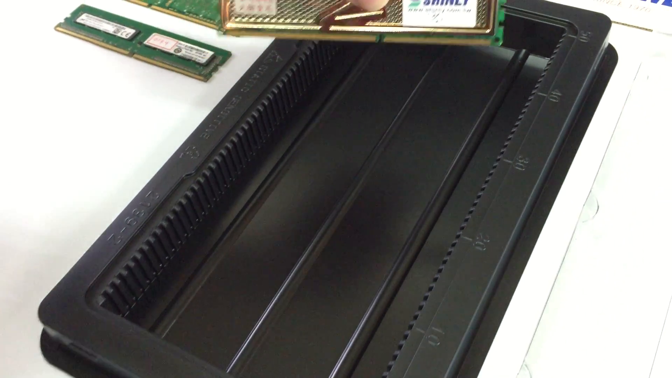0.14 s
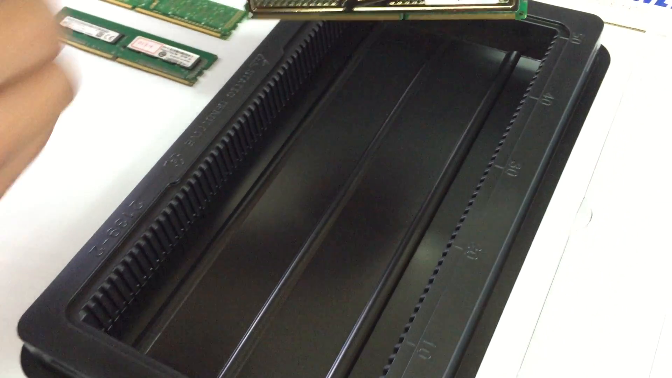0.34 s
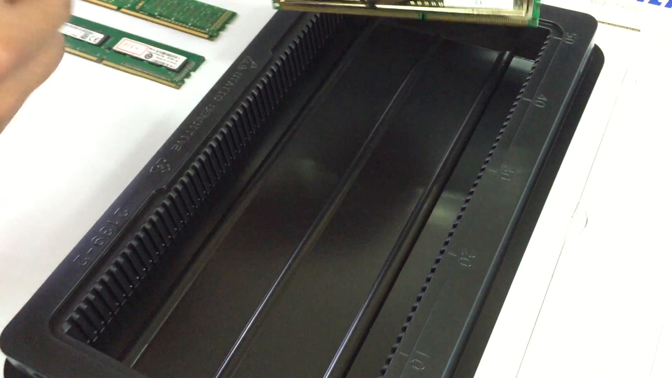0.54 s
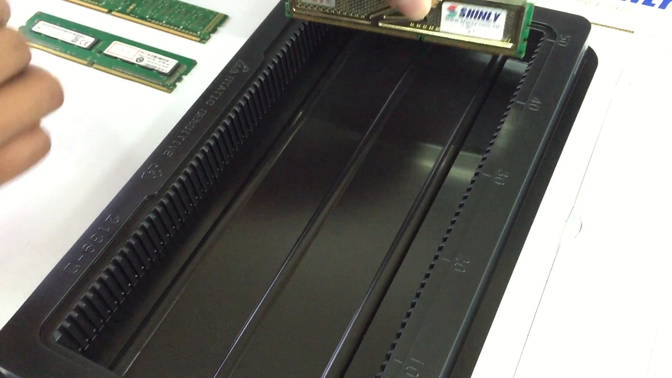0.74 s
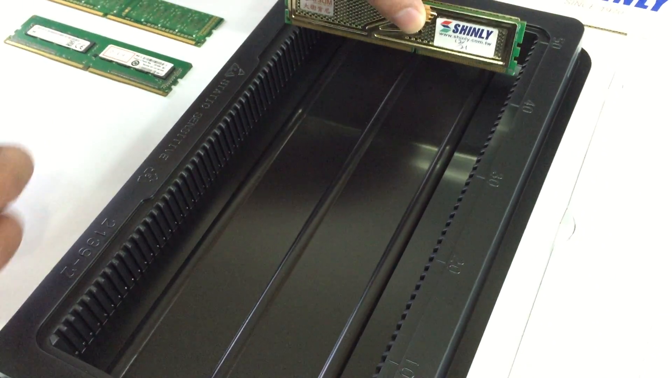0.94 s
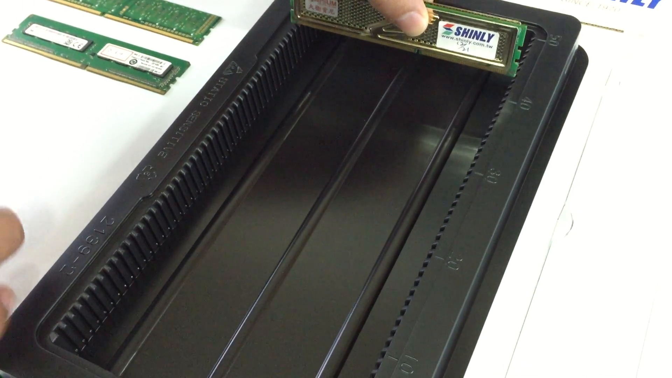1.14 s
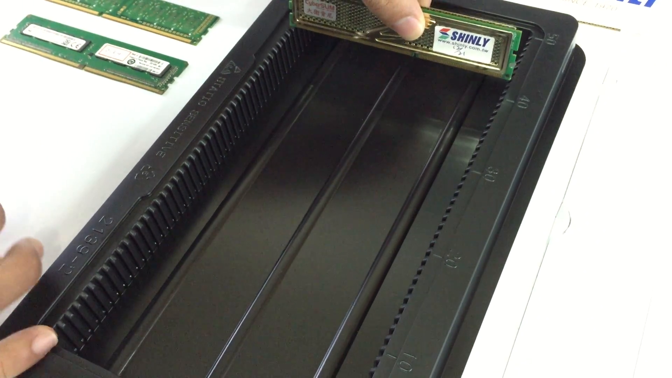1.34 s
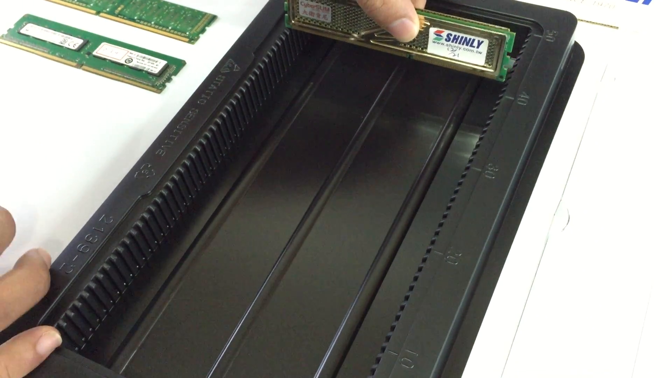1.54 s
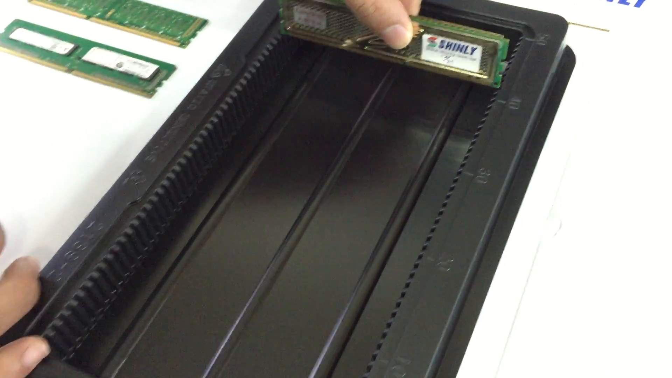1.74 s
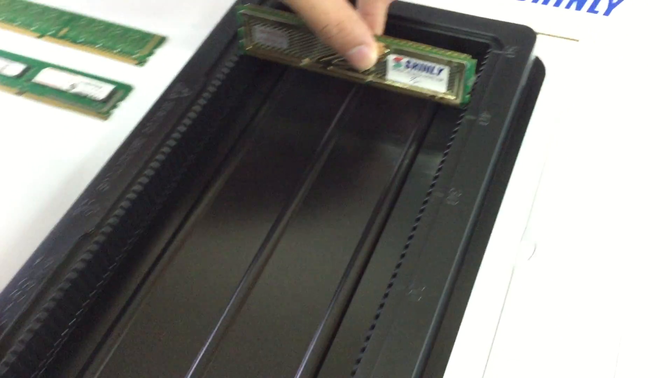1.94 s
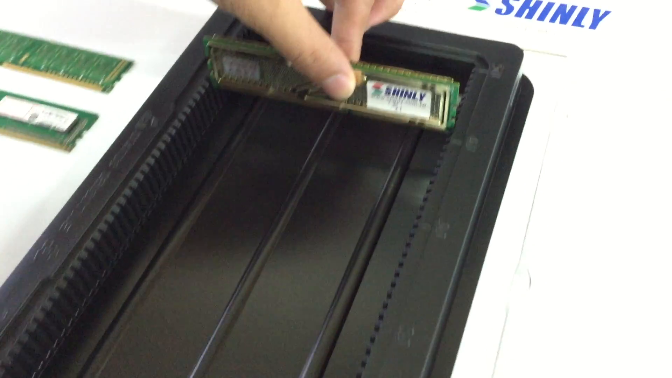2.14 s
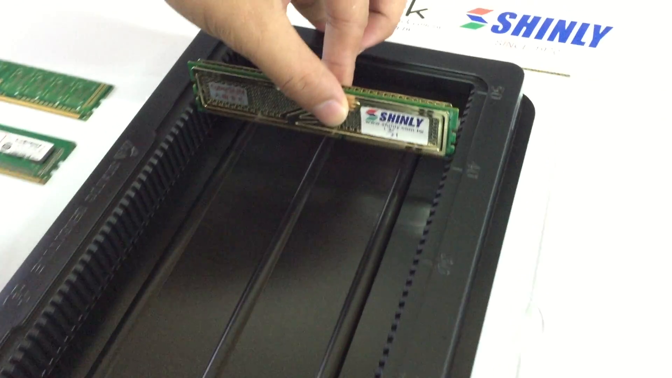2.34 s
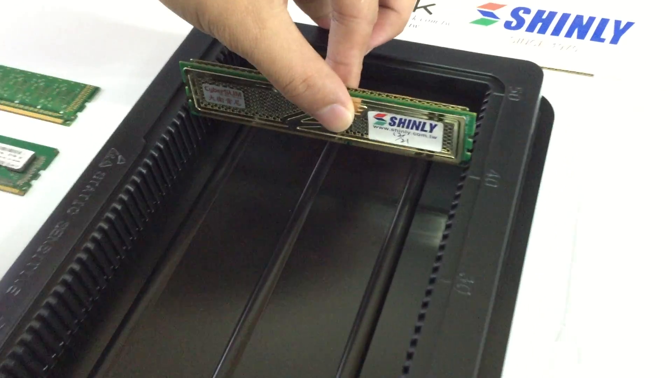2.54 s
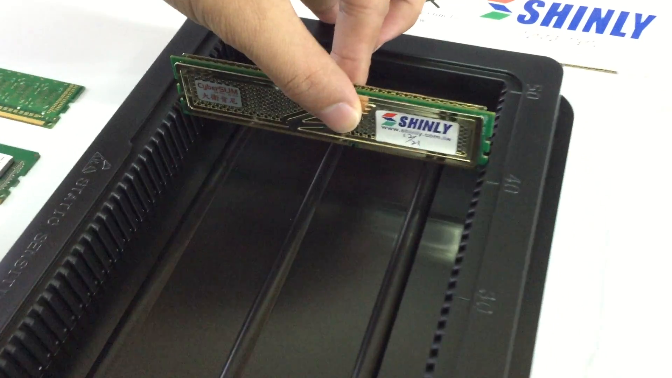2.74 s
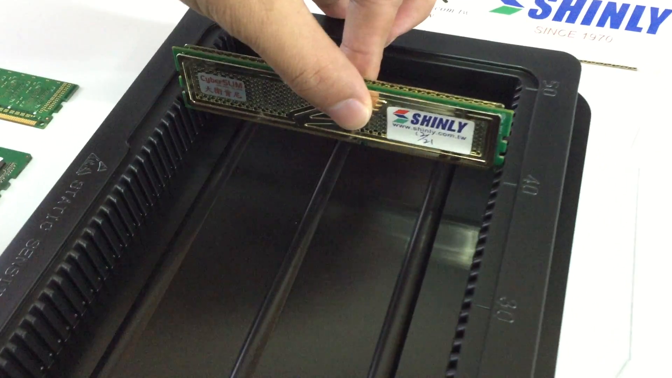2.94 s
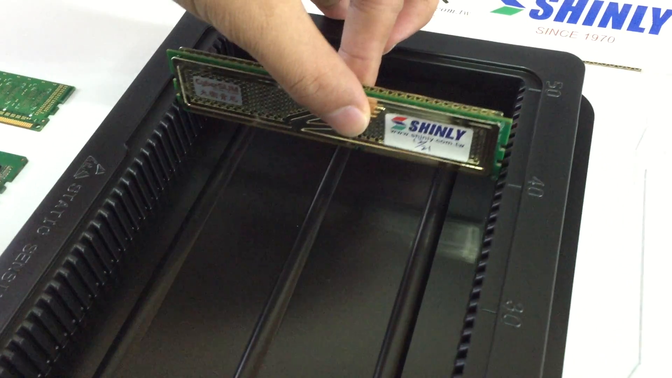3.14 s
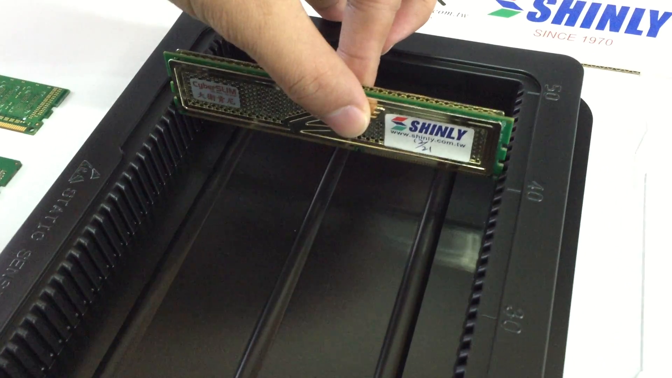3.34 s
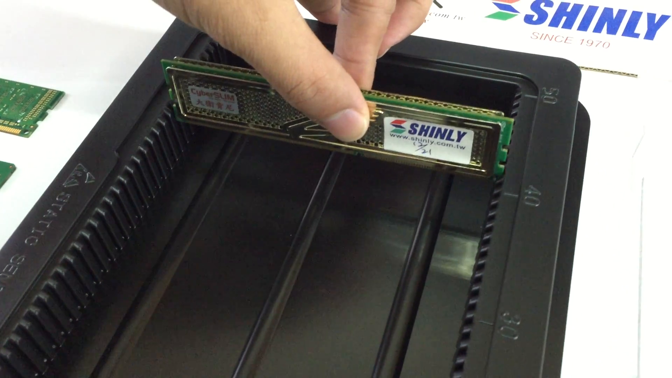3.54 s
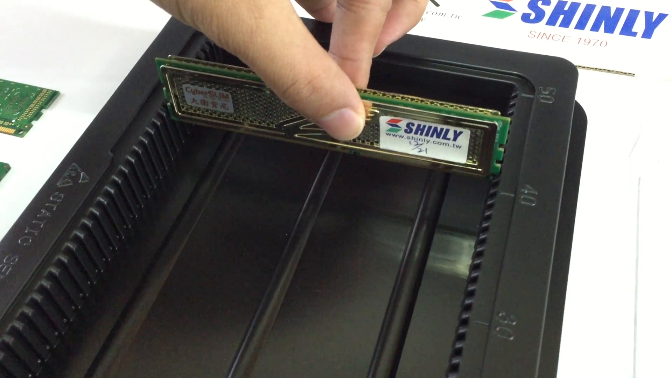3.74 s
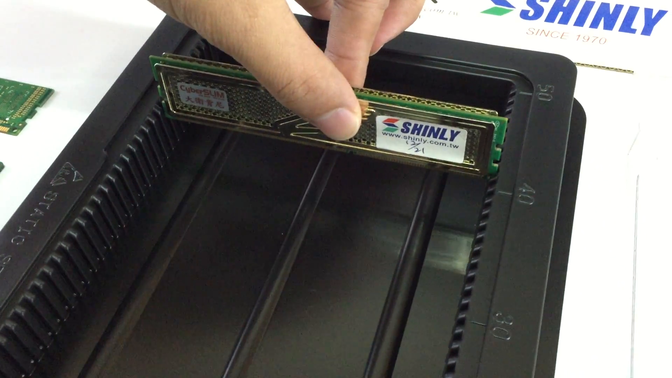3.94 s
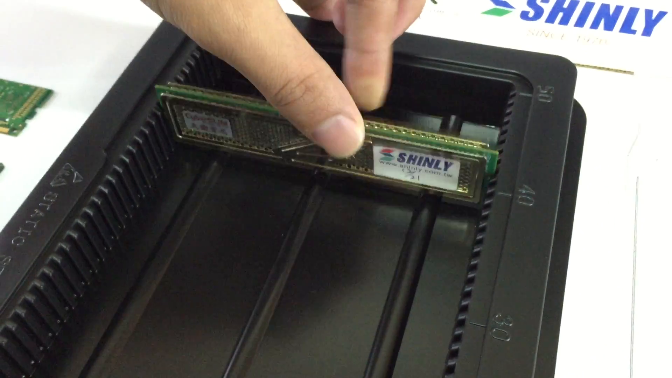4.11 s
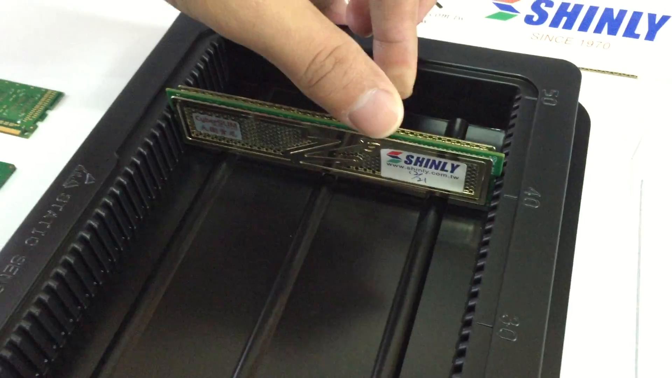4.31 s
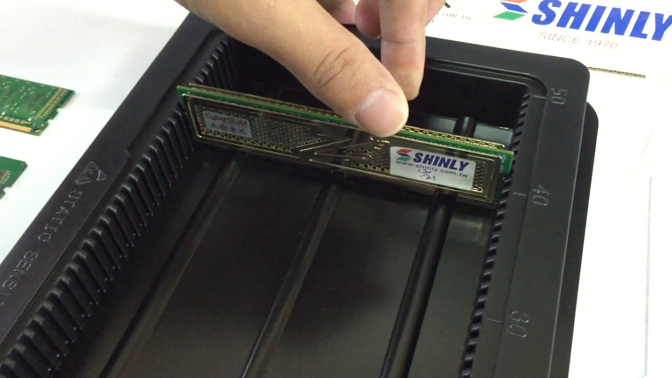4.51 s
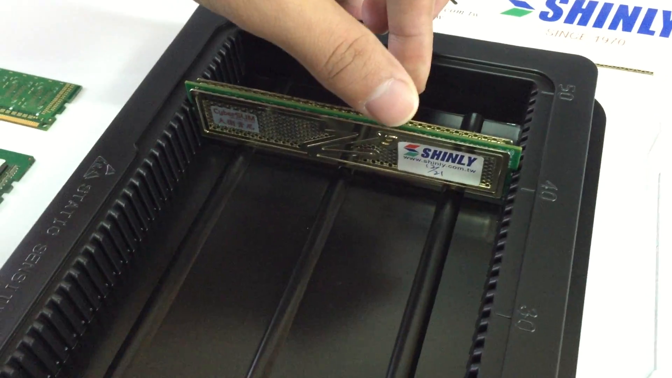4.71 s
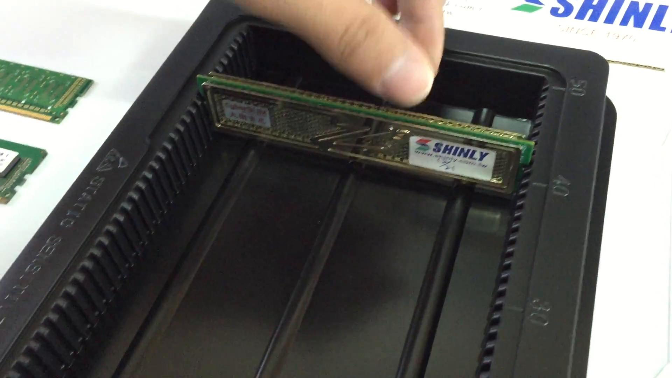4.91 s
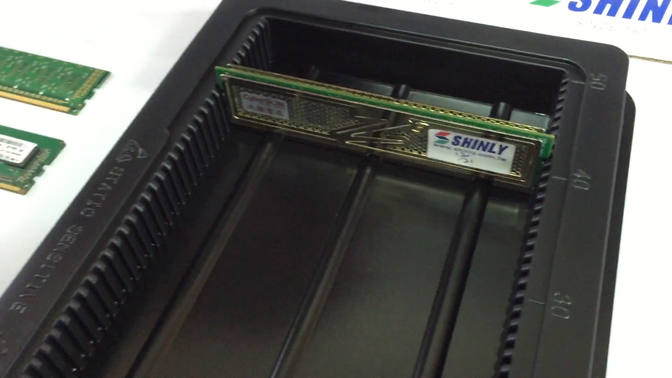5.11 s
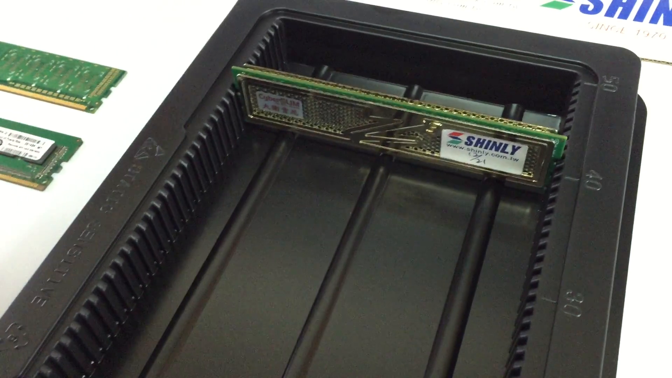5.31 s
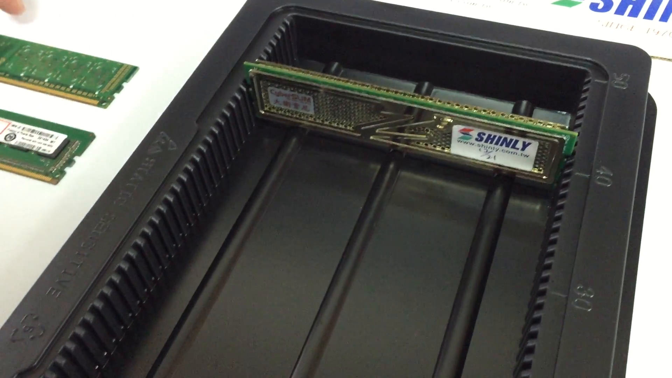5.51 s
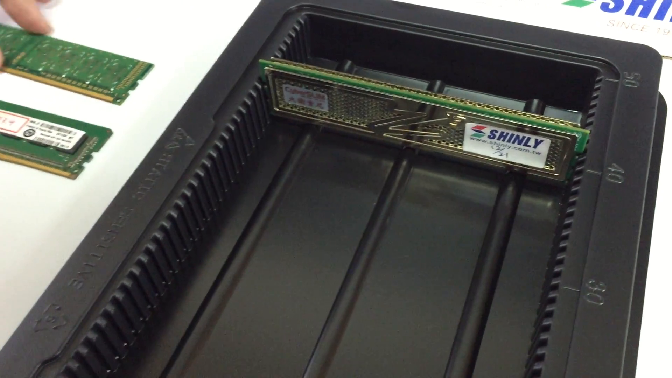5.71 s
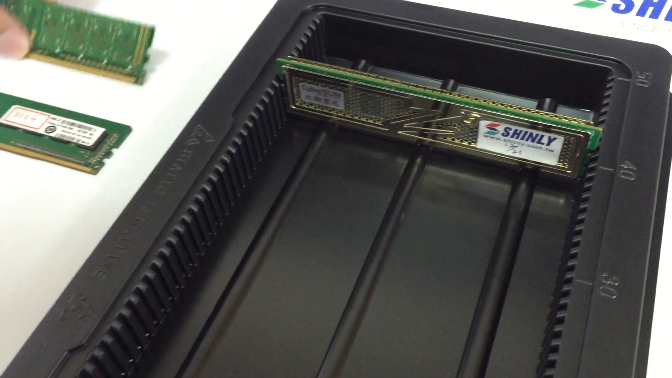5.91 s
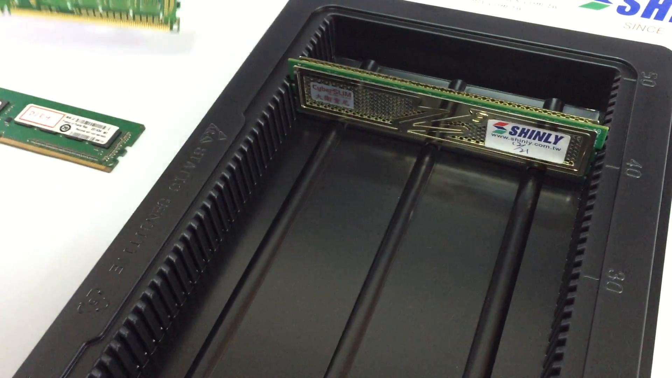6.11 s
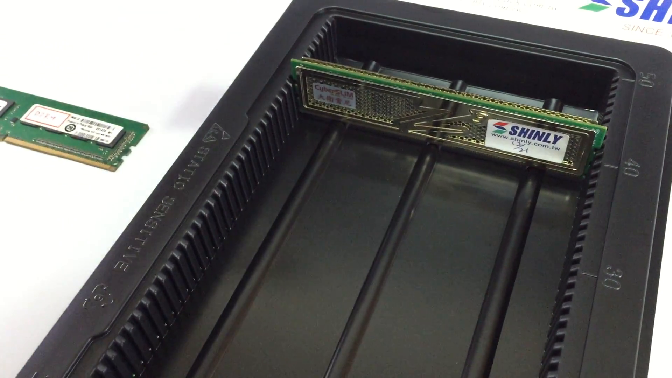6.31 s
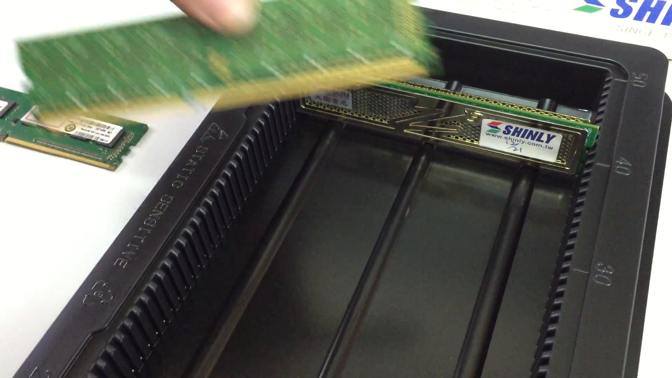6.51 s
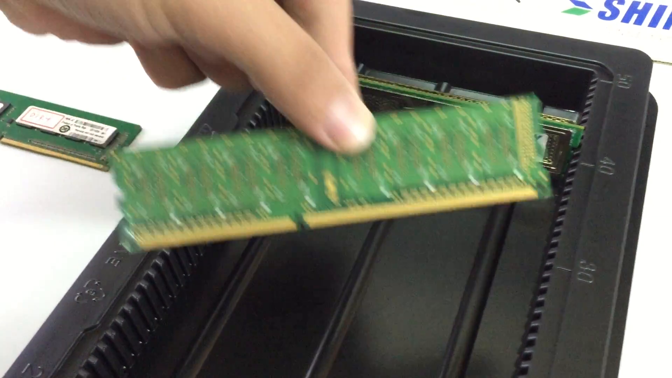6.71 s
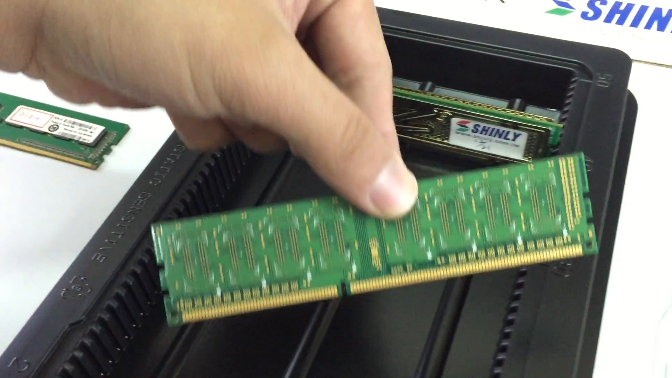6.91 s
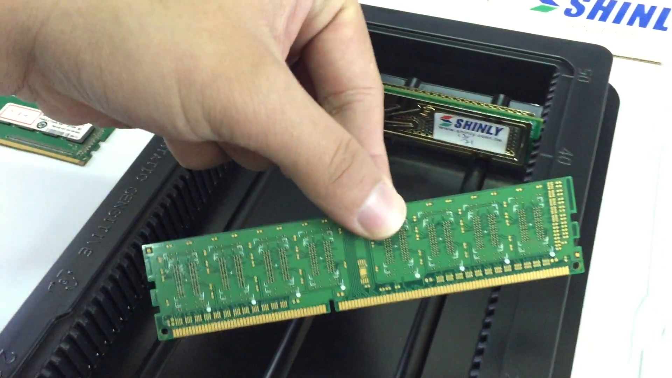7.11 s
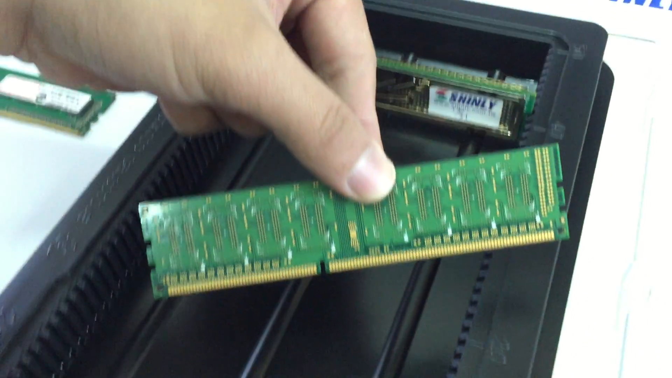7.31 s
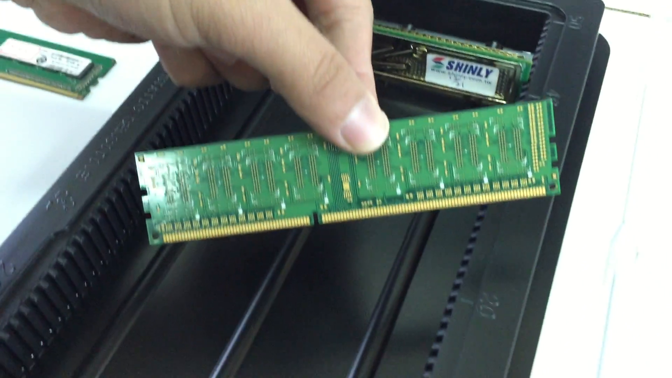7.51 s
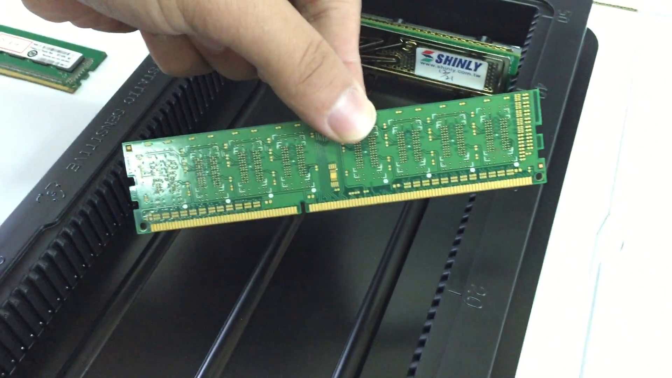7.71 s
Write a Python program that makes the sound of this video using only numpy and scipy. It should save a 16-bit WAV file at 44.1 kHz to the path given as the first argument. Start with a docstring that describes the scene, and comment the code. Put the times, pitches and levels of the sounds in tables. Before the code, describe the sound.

A circuit board taps and slides in a thin plastic tray, snaps home with an overloaded crack, then brief bright rubs follow in a humming room.

```python
"""A metal-covered memory module is worked into the slots of a thin plastic tray, close to a microphone.
Knocks ring the tray's modes, and hard edges crack and ring the module; the snap home overloads the input.
Between them, streams of tiny slips make the scuffs and slides, and narrow resonances the squeaks and drags.
Then a second module is picked up from the table. Filtered noise makes the small room's ventilation and hum."""
import sys
import numpy as np
from scipy import signal
from scipy.fft import rfft, irfft, next_fast_len
from scipy.io import wavfile

SR = 44100
rng = np.random.default_rng(int(sys.argv[2]) if len(sys.argv) > 2 else 0)


def unload_audio(sound):
    """Save the sound as a 16-bit wav file, at the path given as the first command line argument."""
    columns = np.transpose(np.atleast_2d(sound))
    # keep every value between -1 and 1, then stretch to whole-number steps
    steps = np.round(np.clip(columns, -1, 1) * 32767)
    wavfile.write(sys.argv[1], SR, steps.astype(np.int16))


N = 341775  # samples, 7.75 s


def amp(db):
    """Decibels to gain."""
    return 10 ** (np.asarray(db) / 20)


def unit(x):
    """Scales to rms 1."""
    return x / np.sqrt(np.mean(x ** 2) + 1e-20)


def read(points, hz):
    """Reads a spectrum table on a log-frequency axis."""
    f, value = np.transpose(points)
    return np.interp(np.log(hz + 1), np.log(f + 1), value)


def add(mix, start_s, sound):
    """Adds a sound to the mix from a start time, cutting off what overruns the end."""
    part = mix[max(round(start_s * SR), 0):][:len(sound)]
    part += sound[:len(part)]


def colour(x, gain):
    """Filters by a gain that is a function of frequency; rms 1."""
    size = next_fast_len(len(x))
    spectrum = rfft(x, size) * gain(np.fft.rfftfreq(size, 1 / SR))
    return unit(irfft(spectrum, size)[:len(x)])


def narrow(size, hz, width_hz):
    """Noise in one resonance; rms 1."""
    return colour(rng.standard_normal(size), lambda f: 1 / (1 + ((f - hz) / width_hz) ** 2))


def held(size, hz, width_hz):
    """A wavering tone whose swing is limited; rms 1."""
    tone = signal.hilbert(narrow(size, hz, width_hz))
    return unit(tone.real / np.sqrt(abs(tone) ** 2 + .3))


def uneven(size, depth_db, top_hz):
    """A gain that wanders at random, mostly slower than top_hz; depth_db is its rms swing."""
    wander = colour(rng.standard_normal(size), lambda f: 1 / (1 + (f / top_hz) ** 4))
    return amp(depth_db * wander)


def dying(spectrum, t60, size):
    """A dense response in which each band dies at its own speed."""
    noise = colour(rng.choice([-1., 1.], size), lambda f: amp(read(spectrum, f)))
    hz, t, bands = signal.stft(noise, SR, nperseg=256)
    decay = amp(-60 * t / read(t60, hz)[:, None])
    return signal.istft(bands * decay, SR, nperseg=256)[1][:size]


def ringing(modes, t):
    """Struck modes dying away; neighbours in the table swing in opposite senses."""
    hz, level_db, t60_s = np.transpose(modes)[:, :, None]
    sign = (-1) ** np.arange(len(modes))[:, None]
    rings = sign * amp(level_db - 60 * t / t60_s) * np.sin(2 * np.pi * hz * t)
    return unit(rings.sum(0))


def grains(size, spread_db, per_s):
    """Friction: a stream of tiny slips of uneven strength."""
    strength = amp(spread_db * np.minimum(rng.exponential(1, size), 4))
    slipping = rng.random(size) < per_s / SR
    return rng.choice([-1., 1.], size) * strength * slipping


def stroke(t, rise_s, fall_s):
    """Contact pressure builds up to t = 0, then lets go."""
    return np.exp(np.where(t < 0, t / rise_s, -t / fall_s))


# rush of air, relative density per Hz: pitch_hz, level_db
AIR_COLOUR = [(20, -28.5), (35, -13.5), (53, -6.5), (80, -4.5), (130, -7), (210, -12.5), (320, -17.5),
              (420, -26.5), (600, -31), (900, -29.5), (2200, -33), (3000, -38.5), (6000, -42),
              (9000, -45.5), (10300, -49.5), (12000, -46), (15000, -51)]
# deepest hum, swelling and sinking slowly: time_s, level_db
HUM_SWELL = [(0, -55.5), (.5, -48.5), (2.2, -52.5), (3.2, -54), (3.9, -46), (4.6, -48), (5.3, -51.5),
             (6.0, -55.5), (7.15, -48.5), (7.75, -58)]
# higher hum in the room: pitch_hz, width_hz, level_db
ROOM_HUMS = [(110, 25, -56.5), (157, 25, -67), (204, 16, -58.5), (392, 15, -78.5), (577.4, 20, -78.5),
             (876.4, 20, -81)]


def ventilation(air_db=-53, hum_hz=54, waver_db=2.5, waver_hz=4):
    """A steady rush of air as shaped noise, with a wavering hum and faint fan tones as narrow bands."""
    air = colour(rng.standard_normal(N), lambda f: amp(read(AIR_COLOUR, f)))
    swell = amp(np.interp(np.arange(N) / SR, *np.transpose(HUM_SWELL)))
    hum = swell * held(N, hum_hz, width_hz=9.1) * uneven(N, waver_db, waver_hz)
    fan_tones = sum(amp(level_db) * narrow(N, hz, width_hz) for hz, width_hz, level_db in ROOM_HUMS)
    return amp(air_db) * air + hum + fan_tones


def room(x, wet_db=-26, delay_s=.008):
    """A short, faint tail from the furnished room, each band dying at its own speed."""
    # pitch_hz, level_db
    tail_colour = [(100, -1.0), (800, -2.0), (1500, 0), (3000, 0.0), (5000, -4.5),
                   (7300, 0.5), (8800, -4), (10500, 3), (15000, 1.0)]
    # pitch_hz, t60_s
    tail_t60 = [(150, .25), (1500, 0.17), (5000, 0.22), (14000, 0.15)]
    tail = dying(tail_colour, tail_t60, size=16384)
    echo = np.zeros(N)
    add(echo, delay_s, signal.fftconvolve(x, tail / np.linalg.norm(tail)))
    return x + amp(wet_db) * echo


def rubbed_tones(rows):
    """Friction feeds one resonance for as long as the stroke lasts."""
    out, t = np.zeros(N), np.arange(-SR // 2, SR // 2) / SR
    for peak_s, level_db, rise_s, fall_s, hz, width_hz in rows:
        tone = stroke(t, rise_s, fall_s) * held(len(t), hz, width_hz)
        add(out, peak_s + t[0], amp(level_db) * tone)
    return out


# faint whistles: peak_s, level_db, rise_s, fall_s, pitch_hz, width_hz
DRAG_STROKES = [(.08, -69.5, 1, 0.12, 1480, 60), (.72, -69.5, 0.47, 0.13, 5670, 260),
                (0.65, -74, .15, 0.13, 7400, 300), (.84, -70, 0.28, 0.12, 2800, 250),
                (1.42, -70, 0.19, .22, 2200, 230), (1.45, -78, 0.12, 0.29, 6050, 350),
                (3.23, -62.5, 0.024, 0.082, 4220, 180), (3.48, -66, 0.051, 0.13, 4340, 220),
                (4.14, -64, .025, 0.055, 4230, 219.5), (6.56, -76, 0.18, 0.16, 6200, 199.8),
                (6.6, -64, 0.21, 0.17, 2580, 220)]


def drags():
    """Fingers and board edges dragging on smooth faces excite faint, narrow whistles."""
    return rubbed_tones(DRAG_STROKES)


# strokes along the ribs and of fingers over plastic: peak_s, body_db, rise_s, fall_s, fizz_db
SLIDE_STROKES = [(.43, -58, 0.054, 0.064, -63), (.52, -70, 0.073, .07, -58.5), (.82, -68, .45, 0.15, -67.5),
                 (1.42, -69.5, .2, .6, -74), (2.511, -62.5, 0.021, .03, -67),
                 (2.88, -54.5, .04, 0.27, -59.5), (3.015, -51, 0.048, 0.14, -57.5),
                 (3.135, -62, .03, .018, -78), (3.23, -59.5, 0.042, 0.087, -67),
                 (3.3, -70, .055, 0.081, -60), (3.48, -61.5, 0.084, 0.095, -64),
                 (3.76, -63.5, 0.097, 0.056, -72), (4.14, -61.5, 0.054, 0.076, -84),
                 (5.18, -61.5, .04, 0.025, -75), (5.29, -68, 0.062, 0.062, -67),
                 (5.47, -74, 0.021, .03, -68), (5.78, -72, 0.066, .14, -70.5),
                 (6.12, -63, 0.042, 0.082, -66), (6.3, -70, 0.16, 0.47, -70.5), (7.04, -61, 0.11, .06, -66)]
# body of the sliding friction, relative density per Hz: pitch_hz, level_db
SLIDE_BODY_COLOUR = [(290, -40.5), (500, -7), (610, 2), (694, -18), (1110, -3), (1370, -5), (2260, -5.5),
                     (2430, -3.5), (2640, -1.5), (4290, -6), (15000, -24.5)]
# its airy top, relative density per Hz: pitch_hz, level_db
SLIDE_FIZZ_COLOUR = [(2000, -42), (5500, 1), (8500, -0.5), (10300, -6.5), (12500, -1.5), (15500, -7.5)]


def sliding(tick_db=-4.5, tremble_db=1.1, tremble_hz=35, roundness=1.8):
    """Longer, faint strokes: friction swells and ends smoothly, and the hand's pressure trembles."""
    peak_s, body_db, rise_s, fall_s, fizz_db = np.transpose(SLIDE_STROKES)[:, :, None]
    t = np.arange(N) / SR - peak_s
    pressure = np.exp(-abs(t / np.where(t < 0, rise_s, fall_s)) ** roundness)
    slips = unit(grains(N, spread_db=1.5, per_s=6000))
    # sparser, stronger slips: the edge catches and ticks
    ticks = unit(grains(N, spread_db=3, per_s=220))
    body = colour(slips + amp(tick_db) * ticks, lambda f: amp(read(SLIDE_BODY_COLOUR, f)))
    fizz = colour(grains(N, spread_db=2.0, per_s=20000), lambda f: amp(read(SLIDE_FIZZ_COLOUR, f)))
    level = lambda db: np.linalg.norm(amp(db) * pressure, axis=0)  # overlapping strokes add in power
    return uneven(N, tremble_db, tremble_hz) * (level(body_db) * body + level(fizz_db) * fizz)


# short rubs of board edges and fingertips, fizz_db being the floor above the upper edge:
# peak_s, level_db, rise_s, fall_s, low_edge_hz, high_edge_hz, fizz_db
SCUFF_STROKES = [(.166, -54, 0.011, 0.018, 1400, 2610, -35), (0.38, -38.5, 0.01, 0.021, 870, 2420, -28.5),
                 (.386, -30, 0.003, 0.0073, 2060, 7160, -44), (0.404, -44.5, 0.011, 0.033, 4500, 7400, -34),
                 (2.388, -58.5, 0.0047, 0.0061, 1000, 8000, -2),
                 (2.476, -52.5, 0.005, 0.01, 900, 3800, -20), (2.663, -46, 0.0018, 0.012, 1200, 5100, -31),
                 (2.69, -46, 0.019, 0.018, 950, 2700, -33), (2.816, -52, 0.014, 0.042, 1000, 2740, -28),
                 (2.841, -32, 0.0026, 0.015, 1120, 4600, -57),
                 (4.2346, -35.5, 0.00054, 0.0084, 7560, 13000, -20.5),
                 (4.708, -46.5, 0.01, 0.027, 1260, 3100, -15.5), (5.36, -56.5, .008, .015, 1500, 6000, -29),
                 (5.497, -55, 0.0052, 0.015, 1000, 2510, -30), (5.576, -55.5, 0.0055, 0.01, 900, 2500, -33),
                 (5.602, -51.5, 0.0034, 0.014, 1700, 3000, -25),
                 (5.6167, -41, .001, 0.0052, 1900, 3530, -43), (5.711, -56.5, .002, 0.0055, 1600, 9100, -2),
                 (5.821, -48, 0.0087, 0.017, 1400, 2970, -43),
                 (5.845, -57.5, 0.0096, 0.011, 2500, 7980, -23),
                 (5.905, -47.5, 0.0038, 0.023, 1690, 3980, -42.5),
                 (6.017, -33.5, 0.0076, 0.018, 1980, 3560, -21),
                 (6.038, -33, 0.015, 0.016, 1020, 4040, -15),
                 (6.1762, -32.5, .0002, 0.0045, 1990, 13200, -12),
                 (6.185, -31, 0.0021, 0.01, 2160, 13000, -3),
                 (6.204, -39.5, 0.0055, 0.0087, 2200, 8750, -25),
                 (6.345, -52.5, 0.00977, 0.019, 985, 3050, -40),
                 (6.813, -51.5, 0.0026, 0.017, 1300, 2130, -45),
                 (6.905, -55, 0.0065, 0.02, 1300, 2480, -24), (6.958, -36, 0.0027, 0.017, 1306, 2730, -33),
                 (6.98, -56.5, 0.025, 0.031, 1410, 6020, -23.5),
                 (7.06, -57.5, 0.016, 0.021, 5010, 13000, -15), (7.235, -59, .008, .025, 2000, 12020, -19),
                 (7.305, -63, .01, .035, 3990, 11000, -15)]


def scuffs(body_db=-15, catch_db=-0.82, catch_hz=220):
    """Brief bursts of slips: fingertips sound low and narrow, board edges wide and bright."""
    out, t = np.zeros(N), np.arange(-4096, 8192) / SR
    for peak_s, level_db, rise_s, fall_s, low_hz, high_hz, fizz_db in SCUFF_STROKES:
        # body_db is the floor left below the lower edge
        above = lambda f: amp(body_db) * f / (f + 150) + 1 / np.sqrt(1 + (low_hz / (f + 1)) ** 6)
        below = lambda f: amp(fizz_db) + 1 / np.sqrt(1 + (f / high_hz) ** 7)
        slips = colour(grains(len(t), spread_db=1.5, per_s=9700), lambda f: above(f) * below(f))
        # the grip catches and releases at random
        rub = unit(slips * uneven(len(t), catch_db, catch_hz))
        add(out, peak_s + t[0], amp(level_db) * stroke(t, rise_s, fall_s) * rub)
    return out


def through_board(x, ring_db=-4, ring_t60_s=0.036):
    """Friction also shakes the crowd of small resonances in the board, a short dying noise."""
    t = np.arange(2048) / SR
    ring = rng.standard_normal(len(t)) * amp(-60 * t / ring_t60_s)
    rung = signal.oaconvolve(x, ring / np.linalg.norm(ring))[:N]
    return (x + amp(ring_db) * rung) / np.hypot(1, amp(ring_db))


# rubs that catch: peak_s, level_db, rise_s, fall_s, pitch_hz, width_hz
SQUEAK_STROKES = [(2.842, -34.5, 0.0025, 0.013, 3070, 250), (5.618, -41, .001, 0.0074, 2040, 100),
                  (6.03, -45, 0.0042, 0.022, 1110, 115.5), (6.19, -32.5, 0.0037, 0.0069, 5380, 120.5),
                  (6.195, -40, 0.0057, 0.015, 2440, 130), (6.199, -40, 0.0056, 0.0052, 5480, 185.2),
                  (6.2, -43, 0.0022, 0.013, 1920, 152)]


def squeaks():
    """Rubs that catch make one resonance of a board ring."""
    return rubbed_tones(SQUEAK_STROKES)


# blows of the module on the tray, edge_db setting the hard edge against the soft push:
# start_s, level_db, contact_brightness_hz, edge_db
KNOCK_BLOWS = [(.383, -42, 1110, -1), (1.602, -52, 1440, -18), (1.903, -43.5, 1790, -11),
               (2.027, -48, 1200, -9), (2.1635, -42, 1730, -15), (2.839, -44.5, 1110, -22),
               (3.0584, -34, 2330, -14), (3.0625, -39.5, 2120, -2), (3.195, -40, 1113, -14.5),
               (3.3061, -41, 910, -22), (3.588, -43, 1500, -6), (3.6004, -32.5, 1500, -8.5),
               (3.611, -41, 1410, -7), (3.8041, -46.5, 1120, -20), (3.85, -51.5, 1200, -15),
               (4.134, -40, 1290, -12.5), (4.1532, -35, 1900, -7.5), (4.166, -35.5, 1400, -8.5),
               (4.207, -50, 1200, -3), (4.227, -41, 1366, -9), (4.2301, -28, 1310, -10.5),
               (4.2339, -25.5, 1590, -5), (4.2405, -22, 1625, -4.5), (4.2516, -4.5, 650, 10.5),
               (4.2574, -5, 600, 10.5), (4.2611, -14.5, 896, -7), (4.2702, -24, 2510, 1.5),
               (4.2773, -22.5, 2500, 1), (5.236, -47, 900, -3), (5.6168, -50, 1500, 3),
               (6.811, -54, 1600, -8), (6.9573, -41.5, 990, 3.5)]
# modes of the thin tray: pitch_hz, level_db, t60_s
TRAY_MODES = [(151, -13, 0.084), (185, -4.5, 0.075), (280, -14.5, 0.17), (341.3, -11, 0.082),
              (522, -4, 0.028), (560.5, -9, .05), (645, -3, 0.034), (964, -2, 0.043), (1064, -6.5, 0.081),
              (1145, -3, .05), (1305, -5.5, 0.034)]
# crowd of small tray modes between them, relative density per Hz: pitch_hz, level_db
PANEL_COLOUR = [(40, -34), (120, -3.5), (280, -1.5), (430, -1.5), (620, 3), (800, -6), (1100, -0.5),
                (1600, -3), (2200, -3), (4000, -9), (15000, -25)]
# their decay: pitch_hz, t60_s
PANEL_DECAY = [(100, 0.27), (500, 0.053), (2000, 0.057), (6000, 0.015), (15000, 0.029)]
# modes of the board and its metal cover: pitch_hz, level_db, t60_s
MODULE_MODES = [(1437, 0, 0.063), (1877, -12, 0.059), (2060, -4.5, 0.02), (2150, -3.5, 0.052),
                (2326, 1.5, 0.056), (2680, -11, .04), (2870, -9.5, 0.068), (3140, -12, .03),
                (3614, -5.5, 0.044), (4690, -3, 0.027), (4663, -0.5, 0.044), (4856, -4, 0.013),
                (5233, -7.5, .018), (6100, -4.5, 0.028), (5700, -7, 0.013)]
# crack of a board edge on a rib, relative density per Hz: pitch_hz, level_db
CRACK_COLOUR = [(300, -13.5), (900, -13.5), (1400, 0), (2300, -1), (3300, -4), (4700, 5.5), (6200, -2.5),
                (7300, -15.5), (8800, -6.5), (10300, -20), (12000, -13.5), (15000, -16)]
# its decay: pitch_hz, t60_s
CRACK_DECAY = [(500, 0.043), (2000, 0.04), (5000, 0.022), (9000, 0.027), (15000, 0.02)]


def knocks(panel_db=-3, lowest_hz=120):
    """A soft push reaches only the tray's low modes; a hard edge cracks and rings the module too."""
    out, t = np.zeros(N), np.arange(8192) / SR
    tray, module = ringing(TRAY_MODES, t), ringing(MODULE_MODES, t)
    for start_s, level_db, bright_hz, edge_db in KNOCK_BLOWS:
        body = tray + amp(panel_db) * unit(dying(PANEL_COLOUR, PANEL_DECAY, len(t)))
        push = signal.sosfilt(signal.butter(3, bright_hz, fs=SR, output="sos"), body)
        # the push keeps little deep bass
        push = signal.sosfilt(signal.butter(2, lowest_hz, "high", fs=SR, output="sos"), push)
        edge = module + unit(dying(CRACK_COLOUR, CRACK_DECAY, len(t)))
        blow = unit(push) + amp(edge_db) * unit(edge)
        # the level is that of the blow's energy packed into 5 ms
        blow /= np.sqrt(np.sum(blow ** 2) / (.005 * SR))
        add(out, start_s, amp(level_db) * blow)
    return out


def scene():
    """Handling sounds in the room, over the hum."""
    friction = through_board(sliding() + scuffs())
    handling = drags() + friction + squeaks() + knocks()
    return (ventilation() + room(handling))[None]


def record(dry):
    """Peaks clip at full scale; then rumble and the top treble are cut."""
    clipped = np.clip(dry, -1, 1)
    coupled = signal.sosfilt(signal.butter(2, 26, "high", fs=SR, output="sos"), clipped)
    treble_cut = signal.firwin(511, 15400, window=("kaiser", 9), fs=SR)
    return signal.oaconvolve(coupled, treble_cut[None], "same")


dry = scene()
out = record(dry)
unload_audio(out)
```